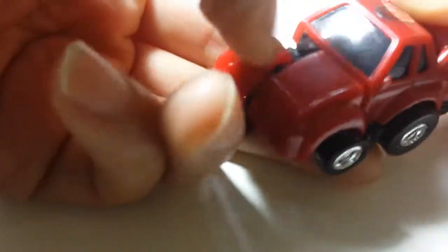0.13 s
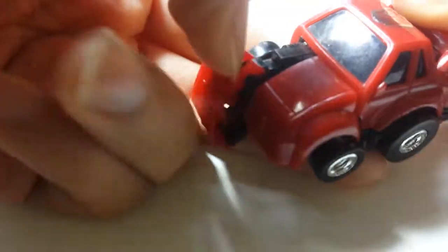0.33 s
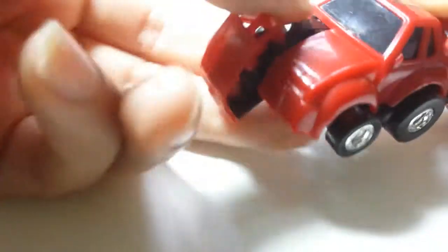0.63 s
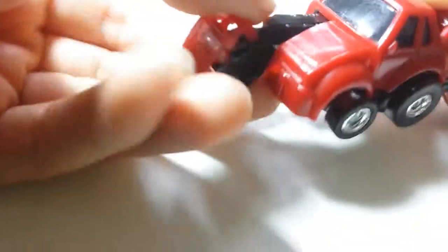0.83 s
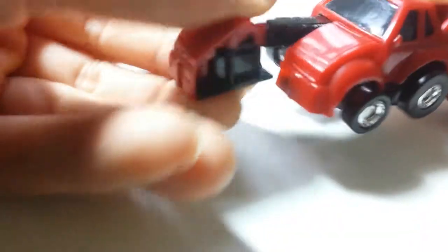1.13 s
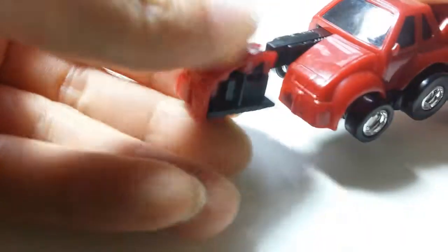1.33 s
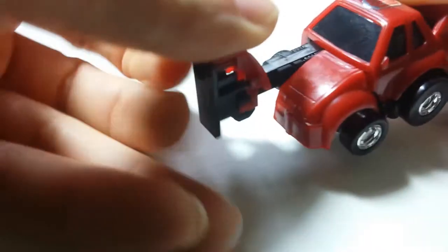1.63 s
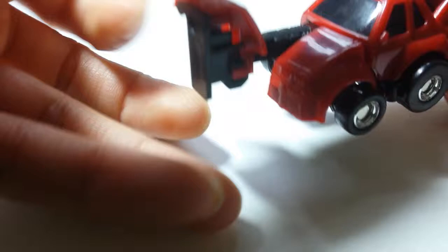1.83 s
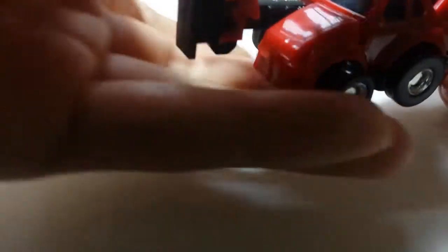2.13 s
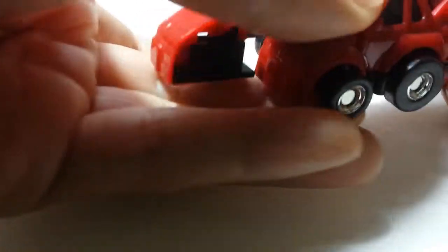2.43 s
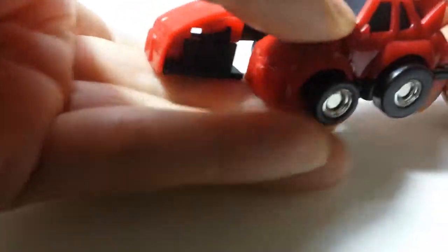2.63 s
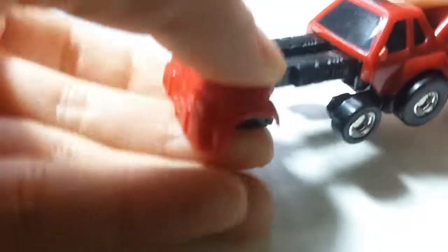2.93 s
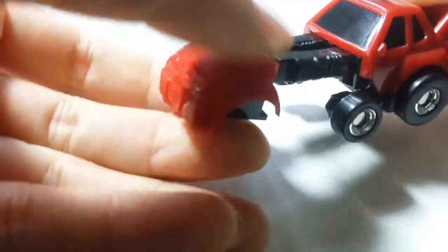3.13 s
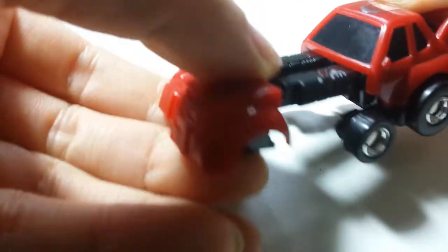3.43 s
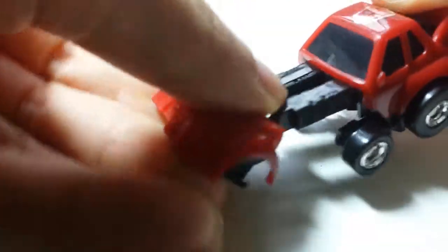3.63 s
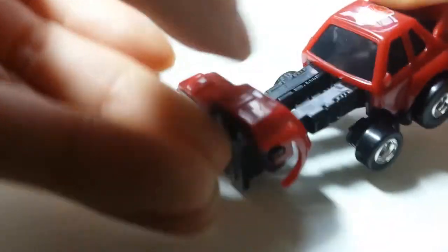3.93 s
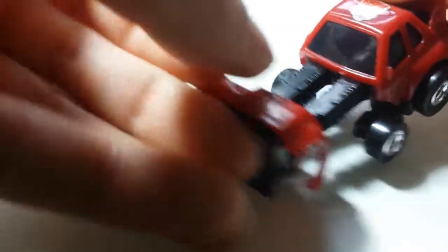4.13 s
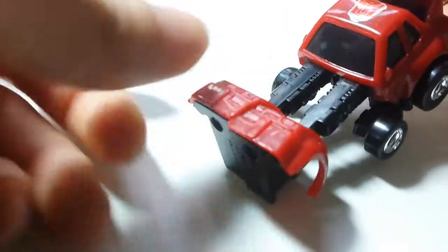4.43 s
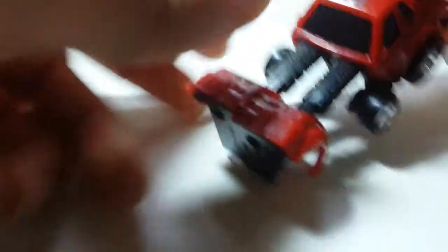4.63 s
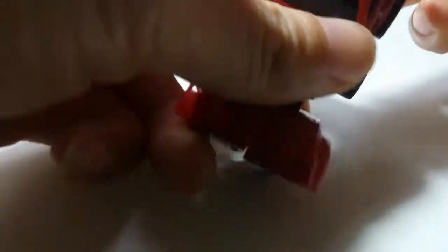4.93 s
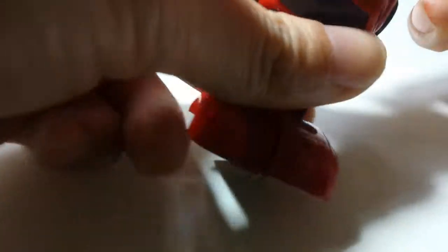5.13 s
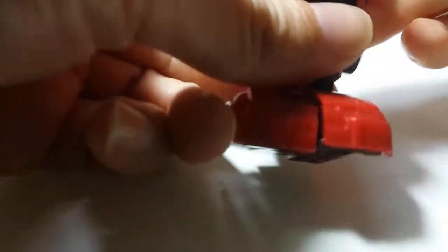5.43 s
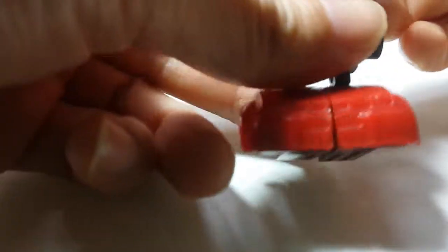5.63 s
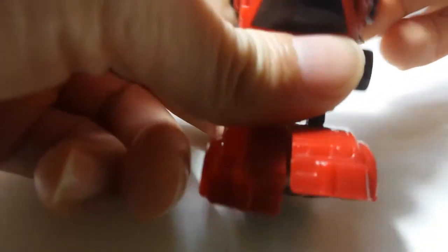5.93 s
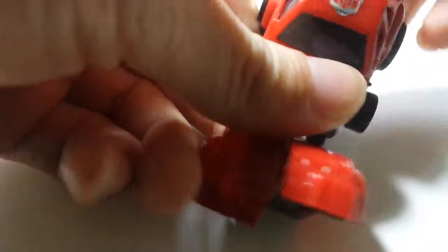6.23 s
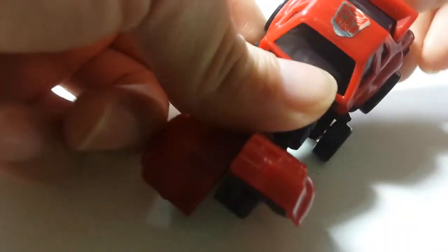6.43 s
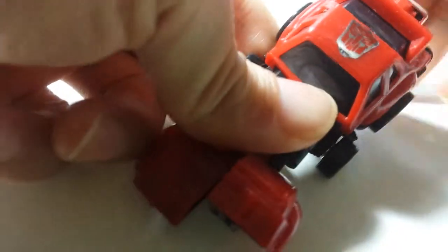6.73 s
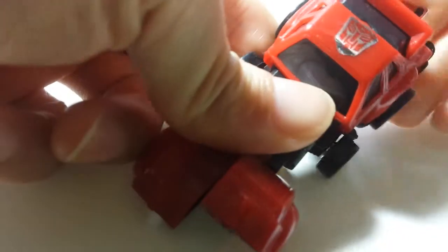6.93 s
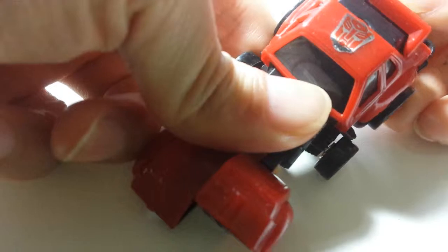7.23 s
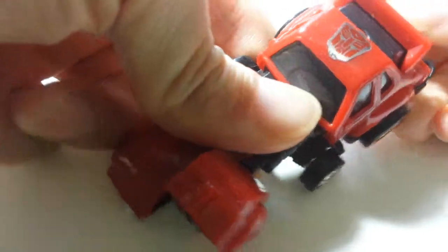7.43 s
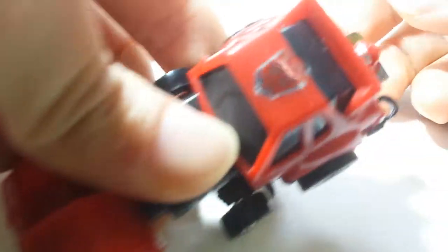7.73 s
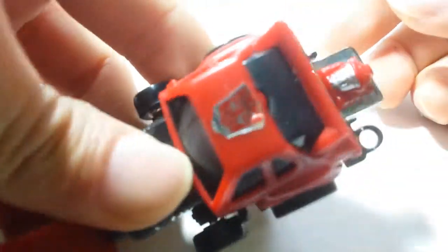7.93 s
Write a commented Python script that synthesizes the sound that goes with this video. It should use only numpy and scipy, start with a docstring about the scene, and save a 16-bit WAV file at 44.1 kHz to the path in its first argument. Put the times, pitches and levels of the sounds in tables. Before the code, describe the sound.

A small hinged plastic toy is handled just in front of a stereo microphone, slightly to the right, in a quiet room. A bright click opens, then sparse ticks and faint rubbing, a dense crackle of joints near three seconds, busier clicks and rubs, a hard snap and table knocks around six and a half, then quiet, with a low pop on the left.

```python
"""A bright plastic click comes first, over a quiet room rumble and drone: a small plastic toy is unfolded by hand
just in front of a two-port microphone, nearer the right port. Joints click as short noise bursts through the shell,
fingers rub it as grainy stick-slip hiss, parts knock on the table and ring its modes, thin tabs ping as fading tones.
Late on, a pressure step pops on the left port alone. A short diffuse room tail follows clicks, knocks and pings."""
import sys
import numpy as np
from scipy import signal
from scipy.fft import rfft, irfft, next_fast_len
from scipy.io import wavfile
from scipy.ndimage import map_coordinates

SR = 44100
rng = np.random.default_rng(int(sys.argv[2]) if len(sys.argv) > 2 else 0)


def waveform_to_disk(signal):
    """Save audio, clipped to [-1, 1], as 16-bit WAV at the path in sys.argv[1]."""
    frames = np.transpose(np.atleast_2d(signal))
    scaled = np.clip(frames, -1, 1) * 32767
    samples = np.round(scaled).astype(np.int16)
    wavfile.write(sys.argv[1], SR, samples)


N = 356312
LAG = 4  # the left port hears the toy this much later [samples]


def amp(db):
    """Decibels to linear gain."""
    return 10 ** (np.asarray(db) / 20)


def unit(x):
    """Scale to rms 1 over all ports together."""
    return x / np.sqrt(np.mean(x ** 2, axis=(-2, -1), keepdims=True) + 1e-20)


def along(points, hz):
    """Read a (frequency, value) curve on a log frequency axis."""
    f, v = np.transpose(points)
    return np.interp(np.log(hz + 1), np.log(f + 1), v)


def curves(rows):
    """One value per sample for each column after the time."""
    s, *cols = np.transpose(rows)
    return [np.interp(np.arange(N) / SR, s, c) for c in cols]


def wobble(rate):
    """A smooth random curve with rate knots a second."""
    knots = rng.standard_normal(int(N * rate / SR) + 4)
    return map_coordinates(knots, [np.arange(N) * rate / SR])


def filtered(x, response):
    """Filter x by a complex response of frequency."""
    m = next_fast_len(x.shape[-1] + 8192)
    return irfft(rfft(x, m) * response(np.fft.rfftfreq(m, 1 / SR)), m)[..., :x.shape[-1]]


def share(hz, edge_hz):
    """A smooth step over frequency: 0 below the edge, 1 above."""
    return 1 / (1 + (edge_hz / (hz + 1)) ** 6)


# level balance of the two ports: (frequency [Hz], left over right [dB])
PORT_BALANCE = [(100, -2), (700, 0), (2400, -2.5), (4400, -0.5), (8100, -12.5), (15000, -4.5)]
# how alike the two ports hear a noise: (frequency [Hz], likeness [correlation])
PORT_LIKENESS = [(60, 1), (500, 0.64), (1500, 0.22), (12000, 0.36)]


def pair(white, gain, lag=0, near=1):
    """Two white noises become a coloured left-right pair of rms 1: partly alike, the left shaded and late."""
    def ports(hz):
        balance_db = along(PORT_BALANCE, hz) / 2
        late = np.exp(-2j * np.pi * hz * lag / SR)
        return gain(hz) * np.array([amp(balance_db) * late, amp(-balance_db)])

    def mix(hz):
        turn = np.arccos(np.clip(near * along(PORT_LIKENESS, hz), -1, 1)) / 2
        return np.array([np.cos(turn), np.sin(turn)])

    common, apart = filtered(white, mix)
    return unit(filtered(np.array([common + apart, common - apart]), ports))


# bed levels before their wobble: (time [s], deep rumble [dB], rumble [dB], drone [dB])
ROOM_LEVELS = [(0, -63.5, -64.5, -67), (.43, -83, -63, -73), (1.2, -75.5, -68.5, -69.5),
               (1.35, -72, -55.5, -65.5), (1.5, -70, -69, -68.5), (1.8, -72, -63.5, -66),
               (2.27, -62.5, -57, -59), (2.56, -62.5, -60, -58), (2.92, -59, -51, -58.5),
               (3.28, -65.5, -65.5, -64.5), (3.94, -68, -59.5, -62.5), (4.3, -55.5, -54, -55.5),
               (4.97, -61, -55.5, -57.5), (5.4, -54, -49.5, -52), (5.85, -65.5, -60, -59),
               (6.46, -55.5, -53, -54), (6.7, -58, -47, -54.5), (6.91, -68, -58.5, -57.5),
               (7.3, -63.5, -51.5, -58), (7.65, -58, -57.5, -52), (8.08, -65, -43, -55.5)]
# colour of the deepest rumble: (frequency [Hz], density [dB per Hz])
DEEP_COLOUR = [(15, -49), (30, -17.5), (55, -14.5), (75, 2), (100, -14), (130, -71)]
# colour of the rumble: (frequency [Hz], density [dB per Hz])
RUMBLE_COLOUR = [(70, -46), (100, -7.5), (122, 1.5), (140, -4), (162, 1.5), (240, -5), (300, -10),
                 (370, -15), (480, -47.5)]
# colour of the drone: (frequency [Hz], density [dB per Hz])
DRONE_COLOUR = [(210, -26), (350, -18.5), (429, -6), (558, -5.5), (655, 0.5), (834, -8), (2000, -25),
                (2600, -54), (4400, -120)]
# colour of the microphone's self-noise: (frequency [Hz], density [dB per Hz])
HISS_COLOUR = [(530, -26), (900, -64), (1170, -14.5), (1630, -8.5), (1880, -5), (7060, 30), (10700, -53),
               (15000, -7), (15500, -48)]
HISS_DB = -76


def background():
    """Rumble and drone of the building as wavering coloured noise, plus the microphone's steady hiss."""
    def noise(colour, near):
        return pair(rng.standard_normal((2, N)), lambda hz: amp(along(colour, hz)), near=near)

    deep_db, rumble_db, drone_db = curves(ROOM_LEVELS)
    deep = amp(deep_db + 1.3 * wobble(5)) * noise(DEEP_COLOUR, .8)
    rumble = amp(rumble_db + 1.3 * wobble(8)) * noise(RUMBLE_COLOUR, 1.05)
    drone = amp(drone_db + 1.2 * wobble(45)) * noise(DRONE_COLOUR, 1.0)
    hiss = amp(HISS_DB) * noise(HISS_COLOUR, 0)  # the ports share none of it
    return deep + rumble + drone + hiss


# strokes of skin over the shell; rise and fall span 20 dB:
# (time at full [s], upper hiss level [dB], rise [s], hold [s], fall [s], lower hiss over upper [dB])
STROKES_OF_SKIN = [(.07, -53, .3, 0.017, .18, -5.5), (.39, -65, 0.062, 0.025, 0.066, -16),
                   (0.645, -52, 0.12, 0.073, 0.14, -10), (.94, -50, 0.079, 0.017, 0.039, -5),
                   (1.08, -62.5, .05, 0.036, 0.12, -2), (1.29, -48, 0.15, 0.026, 0.052, -12.5),
                   (1.5, -50.5, 0.11, 0.004, 0.087, -9), (1.61, -51.5, 0.061, 0, 0.053, -7),
                   (1.68, -51.5, 0.067, 0, 0.099, -8.5), (1.79, -46, 0.051, 0, 0.044, -9),
                   (1.89, -52, 0.16, 0.017, 0.031, -8), (2.02, -52.5, 0.12, 0, 0.17, -9.5),
                   (2.11, -45.5, 0.1, 0, 0.077, -5), (2.162, -53, .1, 0.011, 0.027, -14),
                   (2.48, -46, 0.12, 0, .1, -7.5), (2.902, -40, 0.15, 0.052, 0.12, -5),
                   (3.02, -48, 0.09, 0.024, 0.085, -7.5), (3.194, -51.5, 0.17, 0.027, 0.24, 0),
                   (3.47, -54.5, 0.037, 0.0022, 0.049, -5.5), (3.72, -55.5, 0.44, 0.034, 0.14, -7.5),
                   (3.86, -55, 0.13, 0, 0.3, -10), (4.03, -36.5, 0.033, 0, 0.044, -4),
                   (4.22, -49, 0.17, 0.027, 0.084, -6), (4.303, -49.5, 0.057, 0.053, 0.037, -4),
                   (4.529, -34, 0.025, 0.016, 0.13, -16.5), (4.751, -36.5, 0.16, 0.042, 0.035, -8.5),
                   (4.922, -40, 0.027, 0.083, 0.031, -1), (5.1, -51, 0.047, 0.01, 0.06, -5),
                   (5.19, -47, 0.039, 0, .08, -13), (5.26, -54, .08, 0.035, .15, -5),
                   (5.369, -37.5, 0.085, 0.0014, 0.061, -4.5), (5.474, -51.5, 0.043, .03, 0.09, 1),
                   (5.61, -44.5, 0.33, 0.042, 0.13, -9.5), (5.97, -51, .2, 0, 0.076, -6),
                   (6.05, -51.5, 0.076, 0, 0.14, -4.5), (6.26, -49.5, 0.067, 0, 0.057, -7),
                   (6.48, -41, 0.1, 0, 0.086, -2), (6.654, -27, 0.029, 0.0044, 0.023, 0),
                   (6.801, -50.5, 0.075, 0.026, 0.06, -2.5), (7.406, -49.5, 0.035, 0.0096, 0.1, 0),
                   (7.67, -44.5, 0.16, 0.0089, 0.11, -6), (7.98, -48, 0.19, 0, 0.12, -4.5)]
REST_DB, REST_LOW_DB = -1, -9.5  # faint hiss between strokes: over the drone's level; lower hiss over upper [dB]


def strokes():
    """Gains of the upper and lower hiss: each stroke rises, holds and falls over a faint rest."""
    t = np.arange(0, N, 64) / SR
    rest_db = curves(ROOM_LEVELS)[2][::64] + REST_DB
    s, db, rise, hold, fall, low_db = np.transpose(STROKES_OF_SKIN)[:, :, None]
    before = np.maximum(s - t, 0) / np.abs(rise)
    after = np.maximum(t - s - np.abs(hold), 0) / np.abs(fall)
    power = amp(2 * (db - 20 * (before + after)))
    high = power.sum(axis=0) + amp(2 * rest_db)
    low = (power * amp(2 * low_db)).sum(axis=0) + amp(2 * (rest_db + REST_LOW_DB))
    return [np.interp(np.arange(N) / SR, t, np.sqrt(p)) for p in (high, low)]


# the hollow shell as the microphone hears it, for rubs and clicks: (frequency [Hz], density [dB per Hz])
SHELL_COLOUR = [(530, 29), (900, -1.5), (1080, -6), (1660, -10.5), (1870, -9), (2990, -10), (3330, -4.5),
                (3840, -4.5), (4180, -2), (5440, -3.5), (7250, 0), (9440, -12), (14000, -20), (14900, -31),
                (15800, -51)]
# resonance of the hollow between hand and shell: (time [s], frequency [Hz])
HAND_HOLLOW = [(0, 4260), (.5, 3070), (1.3, 4000), (2.3, 2710), (2.9, 3800), (3.1, 4500), (3.3, 4500),
               (3.6, 2700), (4.4, 2350), (4.78, 2600), (4.96, 3500), (5.37, 1960), (5.6, 3200),
               (6.48, 2400), (6.63, 3400), (6.8, 1500), (7.5, 2500), (8.08, 2760)]
TICKS_PER_S = 900  # fine slips
CRACKLES_PER_S, CRACKLE_DB = 90, 2  # rarer, harder slips: their rate and least level
SKIN_HZ = 14650  # upper hiss stops here


def rub():
    """Skin sticks and slips on the plastic: grainy hiss through the shell and the hollow of the hand."""
    high_gain, low_gain = strokes()
    hollow_hz, = curves(HAND_HOLLOW)
    ticks = (rng.random(N) < TICKS_PER_S / SR) * amp(1.24 * rng.exponential(size=N))
    crackles = (rng.random(N) < CRACKLES_PER_S / SR) * amp(CRACKLE_DB + 3.5 * rng.exponential(size=N))
    grain = 1 + .4 * signal.lfilter([1], [1, -.96], ticks + crackles)  # each slip strikes at once and dies away within about a millisecond
    white = rng.standard_normal((2, N)) * grain * amp(1.3 * wobble(45))

    def upper(hz):
        fizz_db = 3 * share(hz, 10500)  # dry skin adds fizz
        return amp(along(SHELL_COLOUR, hz) + fizz_db) * (hz < SKIN_HZ) * share(hz, 4640)

    def lower(hz):
        return share(hz, 670) * (1 - share(hz, 5920))

    high = pair(white, upper, LAG, near=0.11)
    # the lower hiss passes a resonance that moves with the hand
    hz, t, z = signal.stft(pair(white, lower, LAG, near=0.82), SR, nperseg=256)
    octaves = np.log2((hz[:, None] + 1) / np.interp(t, np.arange(N) / SR, hollow_hz))
    hollow = amp(-4) + np.exp(-(octaves / .36) ** 2)
    hollow /= np.sqrt(np.mean(hollow ** 2 * (hz[:, None] < 5200), axis=0))
    low = unit(signal.istft(z * hollow, SR, nperseg=256)[1][:, :N])
    return high_gain * high + low_gain * low


# clicks of joints and loose parts, level before the envelope, t60 never under 2 ms:
# (time [s], level [dB], note [Hz], low colour [dB], top colour [dB], t60 [s], extra left over right [dB])
JOINT_CLICKS = [(.012, -10, 7730, -1, 15.5, 0.0071, -1), (0.0528, -6, 10430, -7, 7.5, 0.0073, 3.5),
                (.058, -40, 7670, -13, -7.5, 0.016, 5.5), (0.2731, -20.5, 7540, -3, -0.5, 0.0015, 3.5),
                (.372, -17.5, 7360, -13.5, -9, 0.014, 10.5), (.5506, -43, 6900, -9, 10, .0056, 4),
                (0.859, -40.5, 6600, 1, 13, 0.042, 2.5), (.9146, -39.5, 8670, 6, 9, .005, 0.5),
                (0.9414, -35, 7350, 1, 4, .0055, 2), (1.0666, -43, 4100, 4, 9, 0.0063, -7),
                (1.0773, -13.5, 4750, -9.5, 4.5, 0.01, 0.5), (1.1645, -44, 5250, -2, -7, 0.013, 3),
                (1.2359, -25.5, 7170, -11, 6.5, 0.0054, -3), (2.0963, -34, 7050, 2, -23, .046, 2),
                (2.2446, -42, 4200, 10, -32, 0.0095, 3), (2.3775, -46.5, 3900, 4, -15, .007, -2),
                (2.465, -30.5, 7000, -11, -13, 0.0042, 7), (2.4892, -34, 3700, -10, -3, 0.0056, 11),
                (2.497, -28, 8600, -3, 15.5, 0.0049, 1.5), (2.5098, -40, 6270, -7, 6, .0046, 4),
                (2.726, -32, 8860, -4, 1, 0.0046, 5), (2.7317, -32, 4380, -13, -4, 0.0043, 5),
                (2.839, -28.5, 11700, -2, 14, 0.021, 4.5), (2.86, -28, 5800, 10, 12, 0.036, -4),
                (2.8675, -21.5, 6500, -5, 13.5, 0.011, -23), (2.8716, -17, 6940, -5, 11.5, 0.0037, 25),
                (2.8735, -26, 4670, -6, -8, 0.0071, -11), (2.878, -22, 4800, 4, 7, 0.072, 2),
                (2.893, -24, 6300, -5, 10, 0.0086, 20), (2.8966, -19, 8400, -3, 6, .006, -7),
                (2.9059, -21, 7640, 4, 27.5, 0.036, -4), (2.9125, -23, 4200, -10, -5, .007, 7),
                (2.9212, -24.5, 4200, 5, -9, 0.047, 3), (2.932, -21, 5060, -3, 8, 0.0066, 11),
                (2.9397, -21, 4550, 0, 10.5, 0.051, -6), (2.954, -19.5, 9740, 1.5, 19, 0.0062, -6),
                (2.9587, -28, 4530, -1, -5, .005, 8), (3.0698, -39.5, 4650, -1, -6, 0.015, 6),
                (3.246, -35.5, 3260, -22, -5, .018, -2), (3.289, -42, 7950, -16, -13, .005, -3),
                (3.2942, -29.5, 8000, -13, 1, 0.014, -5), (3.2972, -33.5, 7250, -5, -12, 0.0034, -10.5),
                (3.4528, -35, 7200, -39, 4, 0.01, -8), (3.5908, -39, 8150, -2, -1, 0.0078, -3.5),
                (4.0107, -24.5, 10300, 1, 13, 0.021, -3.5), (4.0167, -24, 7040, -4, -3, .015, 8),
                (4.0245, -23, 6060, -7, 4.5, .012, 13), (4.0334, -25.5, 6020, 6.5, 7, 0.011, -7),
                (4.1783, -28, 7530, -4, -2, 0.0043, -15.5), (4.2034, -19.5, 7130, -1, -8, 0.0067, -2),
                (4.2157, -25, 6700, -4, -10, 0.018, 3), (4.309, -35, 4000, -14, 17, 0.011, -1),
                (4.331, -18.5, 7500, 5.5, 6, 0.02, 4.5), (4.5208, -33.5, 7800, -20, 2.5, 0.0043, -16),
                (4.713, -34, 7050, -11, 6.5, .005, -11), (4.8004, -32, 8700, 9, 15, 0.022, -4),
                (4.8478, -24, 6000, -7, 6, 0.011, -3.5), (4.8882, -39, 6000, -7, 9, 0.018, -8.5),
                (4.8994, -25, 4120, -4, -1, 0.021, 2.5), (4.905, -24.5, 6500, 2, -4, 0.011, -2.5),
                (4.9202, -36, 7300, -13, 34, 0.035, 4), (5.0751, -32, 7540, 2, 11.5, .01, 0),
                (5.0854, -36.5, 11400, 7, 5, 0.018, -1), (5.122, -37, 6760, 7, -10, .028, 2),
                (5.187, -50, 7600, 1, 12, 0.055, -10), (5.2265, -32.5, 6070, 6.5, 15, 0.042, -1),
                (5.5133, -30, 4240, 0, -11, 0.0045, -2), (5.5175, -28.5, 6050, 1, -4, 0.017, 3),
                (5.5625, -30, 7500, -1, -8.5, .005, 2), (5.593, -27, 9400, -29, 20.5, 0.0097, -8),
                (5.605, -36.5, 6000, 16, -10, 0.016, 1), (5.6278, -26.5, 7300, -4, 16, .0077, -4),
                (5.6871, -27, 8700, -5, 12, 0.0061, -1), (5.835, -31.5, 7640, 1.5, 0, 0.0066, 1),
                (5.842, -34, 7100, -4, -15, 0.0033, -4), (5.919, -42, 8100, 12, -8, 0.036, -7),
                (5.926, -37, 3740, -10, -7, .004, -1), (5.9654, -12.5, 7100, 4.5, 5.5, 0.019, 4),
                (6.0438, -27.5, 7160, -7, 15, 0.027, -1.5), (6.1233, -27, 7480, 0, 11, 0.0055, 4.5),
                (6.1415, -35, 7040, 6, 3, 0.0034, 2), (6.234, -38.5, 4770, -15, 0, 0.0083, 2),
                (6.254, -37.5, 3850, 6, 3, 0.0076, 11), (6.3998, -30.5, 4070, -4, 10, 0.04, -5),
                (6.423, -16.5, 9300, -31, -12, 0.0052, 6), (6.4316, -34.5, 7170, -13, 12, 0.012, -12),
                (6.462, -38, 2800, 8, -9, .036, -13), (6.4785, -16, 7500, 5.5, -9, 0.0056, 5),
                (6.5116, -37, 7240, 2, 12, 0.007, 3.5), (6.5495, -41.5, 7840, 14, -9, 0.14, 3),
                (6.5736, -34, 4330, -14, 9, 0.0067, -3), (6.6025, -16, 4940, 7, 8, 0.047, 4),
                (6.608, -9.5, 7600, 4, 14, 0.0024, -8.5), (6.613, -43, 4340, -8, 6.5, .012, 27),
                (6.6298, -17, 7200, 5, 9.5, 0.032, -3.5), (6.6383, -28, 7000, -14, -8, 0.014, 21),
                (6.647, -23, 6500, -13, 0, .013, 5), (6.657, -18.5, 6760, -19, -25, 0.04, 11.5),
                (7.064, -46, 4340, 6, 0, 0.0067, 4), (7.136, -47, 3520, 11, -20, 0.014, 4.5),
                (7.3167, -37.5, 4560, -30, 7, 0.0022, 3), (7.6638, -41.5, 3580, 24, -10, 0.06, -9),
                (7.673, -29, 3400, 0, -15, 0.027, 3.5), (7.9946, -33, 6900, -17, 11, 0.0055, -7.5)]
# the jolt of air from a hard snap grows faster than the click
PULSE_DB, PULSE_GROWS = -14, 1.72  # level beside a 0 dB click; dB per dB of click
PULSE_S, PULSE_LATE_S = 0.00019, 0.00058  # width and delay


def clicks():
    """A click is a burst of micro-contacts ringing one part and the shell for a few milliseconds."""
    lead = 128  # samples kept ahead of the click for the creak
    out = np.zeros((2, N + 4096))
    t = np.arange(-lead, 1920) / SR
    after = np.maximum(t, 0)
    for s, db, part_hz, low_db, top_db, t60, pan_db in JOINT_CLICKS:
        def colour(hz):
            tilt_db = low_db * (1 - share(hz, 2990)) + top_db * share(hz, 10800)
            part = 1 + amp(7) / (1 + ((hz - part_hz) / 220) ** 2)  # the part that moves has its own note
            return amp(along(SHELL_COLOUR, hz) + tilt_db) * part * share(hz, 1250)

        burst = pair(rng.standard_normal((2, len(t))), colour, LAG, near=.9)
        blow = amp(-60 * after / max(t60, .002)) * (1 - np.exp(-after / .00035))
        burst /= np.sqrt(np.sum((burst * blow) ** 2) / np.sum(2 * blow ** 2))
        strain = amp(-2.5) * np.exp(-np.abs(t) / 0.0005)  # the joint creaks as it gives way
        shell_ring = amp(-8.0 - 60 * after / 0.023) * (t > 0)
        shape = blow + strain + shell_ring
        pulse = amp(PULSE_DB + PULSE_GROWS * db) * np.exp(-((t - PULSE_LATE_S) / PULSE_S) ** 2)
        pan = amp([[pan_db / 2], [-pan_db / 2]])
        out[:, round(s * SR):][:, :len(t)] += (amp(db) * burst * shape - pulse) * pan
    return out[:, lead:N + lead]


# decay of the room's answer: (frequency [Hz], t60 [s])
WALL_DECAY = [(200, 0.29), (2000, 0.063), (7000, 0.059), (14000, 0.1)]


def walls(x):
    """A diffuse noise tail, 200 samples late, in which each frequency dies at its own speed."""
    hz, t, z = signal.stft(rng.standard_normal((2, SR // 3)), SR, nperseg=256)
    decay = amp(-60 * t / along(WALL_DECAY, hz)[:, None])
    tail = signal.istft(z * decay, SR, nperseg=256)[1]
    late = np.pad(x, ((0, 0), (200, 0)))
    return signal.fftconvolve(late, tail / np.linalg.norm(tail[0]), axes=1)[:, :N]


# dull knocks passed into the table, peak before panning:
# (time [s], peak [dB], bass boom [dB], ring stretch [factor], left over right [dB])
TABLE_KNOCKS = [(0.053, -38.5, 17, 0.47, -15), (0.939, -43, 19, 1.4, 0), (2.881, -26.5, 15, 0.89, -2.5),
                (3.03, -40, 10, 0.81, 1), (3.212, -43.5, 19, 1.6, -6), (3.597, -37, 17, 2.5, -5.5),
                (4.032, -31, -13, 0.38, -8), (4.039, -34.5, 11, 3.1, 2), (4.332, -23.5, 9, 1.06, -10),
                (4.759, -35, -18, 2, -5), (5.085, -32.5, 2, 1.4, -3), (5.122, -41, -8, 1.4, -2.0),
                (5.923, -32.5, -35.5, 1.1, -1), (6.471, -26, -30, 2.4, -3.5), (6.605, -22, 9.5, 2.9, -6),
                (6.639, -38, 16, 0.95, -32), (6.656, -14, -0.5, 1.5, -6), (6.68, -10.5, -4, 0.9, -10),
                (6.686, -15, 2.5, 1.1, 0), (6.948, -19, 5.5, 1.3, -6.5)]
# modes of the table top at stretch 1, before random spread: (frequency [Hz], width [Hz], level [dB])
TABLE_MODES = [(103, 40, -11), (177, 36, -6), (273, 36, -10), (305, 54, -16), (505, 46, -7),
               (560, 20, -2.5), (801, 540, -7.5), (1050, 54, -14), (1440, 43, -43), (2030, 54, -24)]


def knocks():
    """A soft push, low-passed by the contact time, is heard directly and rings the modes of the table."""
    out, t = np.zeros((2, N + SR)), np.arange(SR // 4) / SR
    count = len(TABLE_MODES)
    for s, db, boom_db, stretch, pan_db in TABLE_KNOCKS:
        spot_db = rng.normal(0, 2, (count, 1, 1))
        port_db = rng.normal(0, 2, (count, 2, 1))
        luck = amp(spot_db + port_db)  # each mode varies by spot and by port
        push = amp(-26 - 60 * t / 0.07) * rng.standard_normal(len(t))  # the part chatters as it settles
        push[0] = 1

        def wood(f):
            modes = 0
            for k, (c, width, level_db) in enumerate(TABLE_MODES):
                mode = 1j * f * width / (c * c - f * f + 1j * f * width / stretch)
                modes = modes + amp(level_db) * luck[k] * mode
            direct = amp(-17) * 1j * f / (300 + 1j * f)
            bend = (1j * f / 380) ** 2 + 1.4j * f / 380
            boom = (amp(boom_db) + bend) / (1 + bend)  # a bass shelf
            contact = 1 / (1 + 1j * f / 1900) ** 8  # a rounded push, about a millisecond long
            return (modes + direct) * boom * contact

        ring = filtered(push, wood)
        pan_levels = db + np.array([[pan_db / 2], [-pan_db / 2]])
        out[:, round(s * SR):][:, :len(push)] -= amp(pan_levels) * ring / np.abs(ring).max()
    return out[:, :N]


# thin parts that ping on one note, level before the soft onset: (time [s], level [dB], note [Hz], t60 [s])
TAB_PINGS = [(.604, -43, 3730, .02), (1.6094, -41, 3930, .02), (2.2447, -23.5, 4210, 0.017),
             (3.0694, -42, 4670, .015), (3.2485, -31, 3300, 0.017), (7.117, -42, 4100, 0.022),
             (7.3165, -51, 4570, .015)]


def pings():
    """A small tab, flicked, rings as one fading tone."""
    out, t = np.zeros(N + 4096), np.arange(4096) / SR
    onset = 1 - np.exp(-t / 0.00043)
    for s, db, hz, t60 in TAB_PINGS:
        fade = amp(db - 60 * t / abs(t60))
        out[round(s * SR):][:len(t)] += fade * np.sin(2 * np.pi * hz * t) * onset
    return np.array([np.roll(out, LAG), out])[:, :N]


# the pop's damped swing: (level before phase and onset [dB], recovery [Hz], Q)
POP_SWING = (-7.5, 95, 0.78)
POP_S = 7.7536  # when it strikes [s]


def pop():
    """A pressure step on the left diaphragm alone, pulled back to rest by the input high-pass."""
    db, hz, q = POP_SWING
    t = np.maximum(np.arange(N) / SR - POP_S, 0)
    w = 2 * np.pi * hz
    swing = np.cos(w * np.sqrt(abs(1 - 1 / (4 * q * q))) * t + 0.74)
    step = np.exp(-w * t / (2 * q)) * swing
    onset = 1 - np.exp(-t / .00006)
    return np.outer([1, 0], amp(db) * step * onset)


def scene():
    """Clicks, knocks and pings with their room tail, over rubbing, background and the pop."""
    hits = clicks() + knocks() + pings()
    return hits + amp(-15.0) * walls(hits) + rub() + background() + pop()


def record(dry):
    """The recorder clips at full scale, then keeps nothing above its band limit of 15960 Hz."""
    return filtered(np.clip(dry, -1, 1), lambda hz: hz < 15960)


dry = scene()
out = record(dry)
waveform_to_disk(out)
```